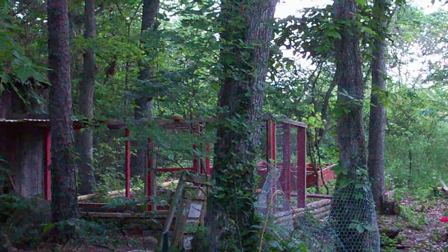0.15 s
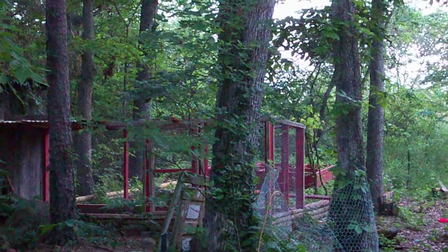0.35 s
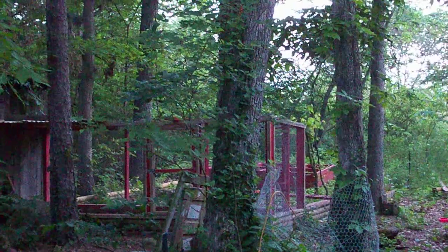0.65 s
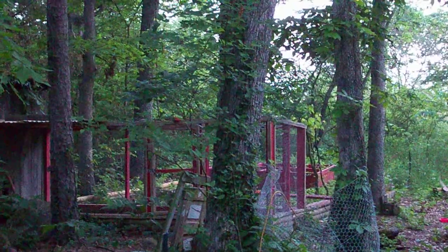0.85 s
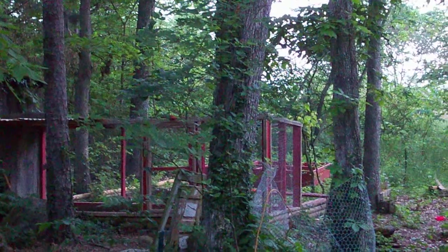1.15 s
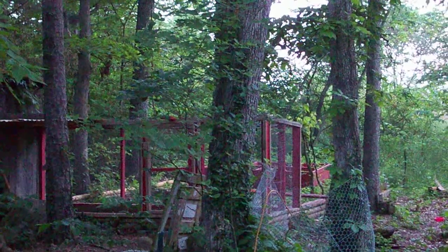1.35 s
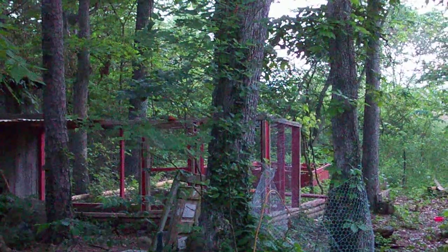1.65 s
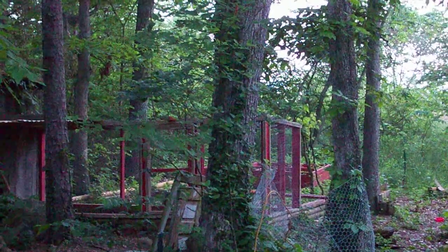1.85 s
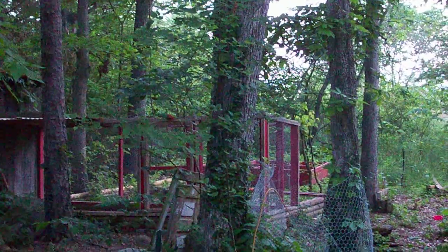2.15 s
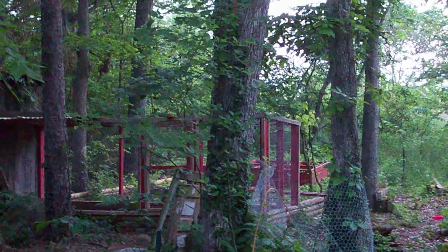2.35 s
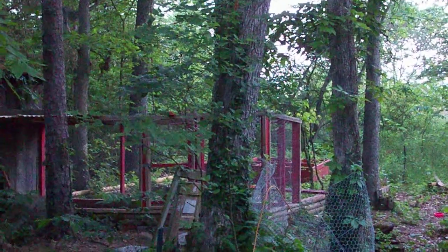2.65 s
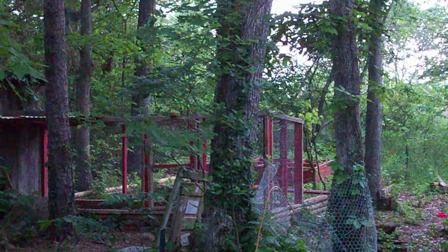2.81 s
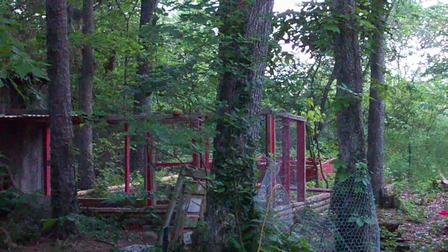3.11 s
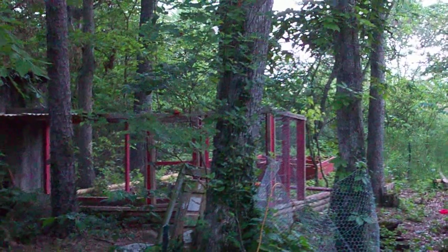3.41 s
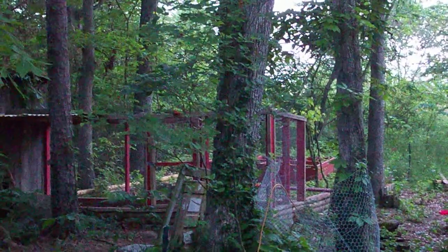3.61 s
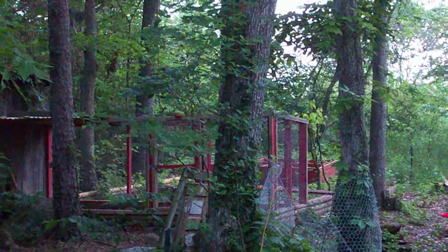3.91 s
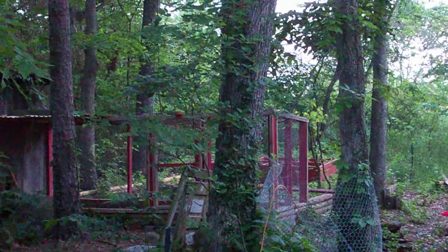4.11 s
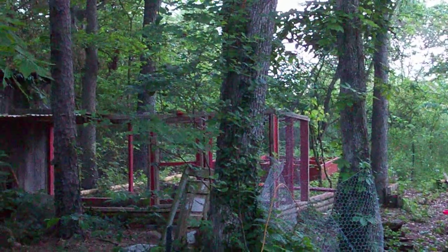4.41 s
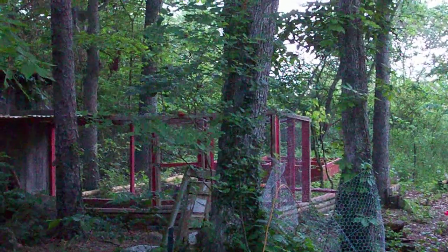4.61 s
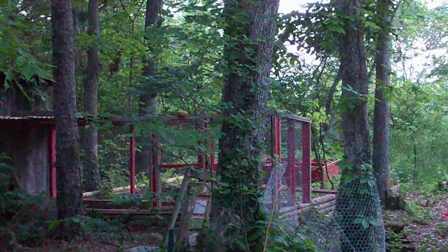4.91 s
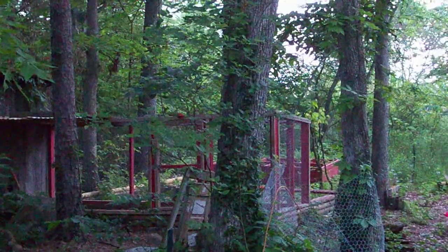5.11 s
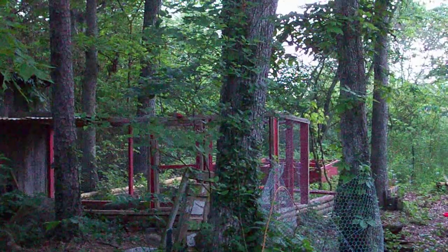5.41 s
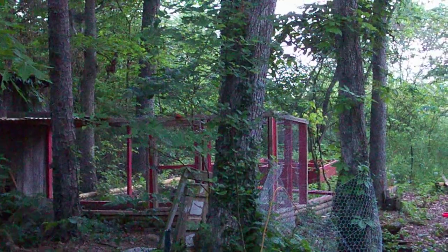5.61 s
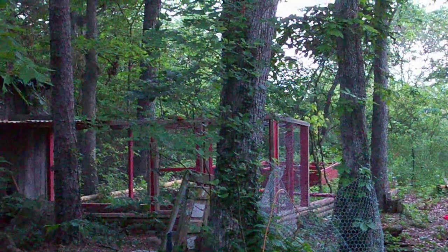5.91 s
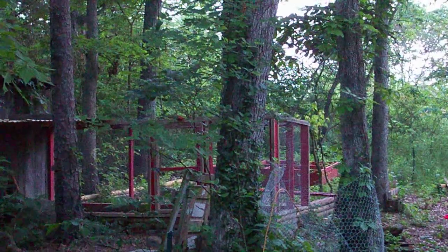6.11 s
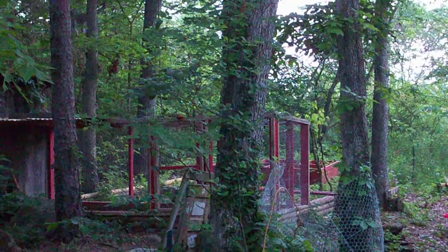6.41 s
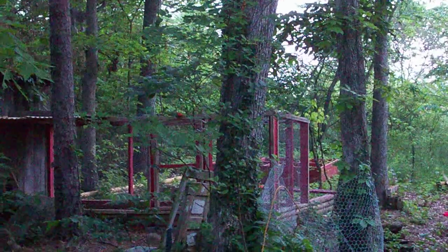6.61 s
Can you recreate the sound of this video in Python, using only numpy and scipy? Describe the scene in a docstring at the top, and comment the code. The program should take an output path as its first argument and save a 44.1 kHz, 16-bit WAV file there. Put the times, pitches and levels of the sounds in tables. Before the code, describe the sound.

A rooster crows hoarsely, then a peacock cries and honks, with chick peeps, songbirds and a distant rooster over faint insects in the woods.

```python
"""A rooster ends a hoarse crow in a wooded yard, the two sides of its syrinx beating against each other.
A peacock gives a two-part cry and a honk; a second rooster crows far off. All three are harmonic tones
shaped by a throat. A chick's peeps and the songbirds' whistles are gliding sines; pen boards knock.
Trunks and leaves scatter every call. Behind: moving air, insects, a distant engine hum that dies away."""
import sys
import numpy as np
from scipy import signal
from scipy.fft import rfft, irfft, next_fast_len
from scipy.io import wavfile
from scipy.ndimage import uniform_filter1d, map_coordinates

SR = 44100
rng = np.random.default_rng(int(sys.argv[2]) if len(sys.argv) > 2 else 0)


def wrap_up_sound(samples):
    """Save the sound to the file named by the first command line argument, as 16-bit audio."""
    columns = np.atleast_2d(samples).T
    # keep every value between -1 and 1, then stretch to whole-number steps
    tamed = np.clip(columns, -1, 1)
    steps = np.round(tamed * 32767).astype(np.int16)
    wavfile.write(sys.argv[1], SR, steps)


N = 297675

# steady whistle contour: (position [0-1], pitch [ratio], level [dB])
FLAT_CONTOUR = [(0, 1, -14), (.2, 1, -1), (.85, 1, 0), (1, 1, -10)]


def amp(db):
    """Decibels to gain."""
    return 10 ** (np.asarray(db) / 20)


def unit(x):
    """Scale to rms 1."""
    return x / np.sqrt(np.mean(x ** 2) + 1e-20)


def along(points, hz):
    """Interpolate (frequency [Hz], value) points on a log axis."""
    knots_hz, values = np.transpose(points)
    return np.interp(np.log(hz + 1), np.log(knots_hz + 1), values)


def wobble(rate_hz, size):
    """Smooth random curve with knots at rate_hz."""
    knots = rng.standard_normal(int(size * rate_hz / SR) + 4)
    return map_coordinates(knots, [np.arange(size) * rate_hz / SR])


def cycle(hz):
    """Running phase [rad]."""
    return 2 * np.pi * np.cumsum(hz) / SR


def add(track, start_s, x):
    """Mix x into the track."""
    span = track[max(round(start_s * SR), 0):][:len(x)]
    span += x[:len(span)]


def filtered(x, gain):
    """Zero-phase filter with response gain(hz)."""
    size = next_fast_len(N + SR // 2)
    return irfft(rfft(x, size) * gain(np.fft.rfftfreq(size, 1 / SR)), size)[:N]


def noise(spectrum):
    """Coloured noise, rms 1."""
    return unit(filtered(rng.standard_normal(N), lambda hz: amp(along(spectrum, hz))))


def near_rooster():
    """High crow, turning hoarse and breaking to a lower register; the two syrinx sides beat."""
    # syllables: (start [s], length [s], top [Hz], crest [0-1], scoop [0-1], sag [0-1],
    # opening [dB], closing [dB], overtones [dB], roughness [0-1])
    crow = [(0.0, 0.11, 1087, 0.48, .15, 0.36, -29.5, -35, -45, 0.01),
            (0.132, .135, 977.6, 0.32, .1, 0.04, -32, -36, -43, 0),
            (0.255, 0.22, 1008, .25, 0.06, 0.12, -31.5, -34.5, -43, 0.02),
            (0.439, 0.17, 893, 0.42, .01, 0.01, -42, -38, -48, .05),
            (0.593, 0.3586, 943.2, .65, 0, 0.08, -38.5, -43.5, -45, 0.01),
            (0.938, .52, 731, .1, .005, .135, -47, -53.5, -54, .021),
            (1.455, 0.038, 623, 0.12, 0, 0.33, -52.5, -53, -70, 0)]
    # throat in the high and low registers, rasp spectrum: (frequency [Hz], level [dB])
    high_throat = [(600, -9), (950, 21), (1400, -11.5), (1900, 5.5), (2200, -14), (2800, -37), (3800, -16),
                   (5000, -40), (8000, -57)]
    low_throat = [(500, -23.5), (760, 10.5), (950, 3.5), (1450, 4), (1750, -6.5), (2150, -8), (2450, -4.5),
                  (2900, -21.5), (5000, -43.5)]
    rasp = [(700, -8), (1000, -2), (1400, 3.5), (2000, 6.5), (2500, -1.5), (3200, -13.5), (5000, -44.5)]
    beat_hz = 44.86
    held, end = np.zeros(N), np.zeros(N)
    for row in crow[:-2]:
        t, hz, db, upper_db, rough = syllable(row, attack_s=0.0032, dull_db=-5.5, hoarse=0.28)
        strong = (t, hz, db, upper_db - 2.5, rough)
        weak = (t, hz - beat_hz, db - 4, upper_db - 7.5, rough)
        for side in (strong, weak):
            held += call(side, high_throat, split_hz=1500, rasp_db=-24, half_db=-53, uneven_db=0)
        add(held, t[0], amp(-24.5) * rough * noise(rasp)[:len(t)])
    for row in crow[-2:]:
        t, hz, db, upper_db, rough = syllable(row, attack_s=0.0052, dull_db=-1, hoarse=0.05)
        strong = (t, hz, db - 2.5, upper_db, rough)
        weak = (t, hz + beat_hz, db - 7, upper_db - 12.5, rough)
        for side in (strong, weak):
            end += call(side, low_throat, split_hz=1670, rasp_db=-5.5, half_db=-15.5, uneven_db=1)
    rattle = amp(3.5 * wobble(160, N))
    voice = ground(held + end * rattle, notch_hz=1093, width_hz=46, depth_db=-10)
    return woods(voice, trunks_db=-5.5, leaves_db=-3.5, tail_db=-11)


def syllable(row, attack_s, dull_db, hoarse):
    """Curves for one pitch arch; off the crest the slack voice roughens and overtones shift by dull_db."""
    start_s, length_s, top_hz, crest, scoop, sag, open_db, close_db, overtone_db, rough = row
    t = np.arange(int(length_s * SR)) / SR
    u, crest = t / length_s, np.clip(crest, 0.01, 0.99)
    slack = scoop * np.maximum(1 - u / crest, 0) ** 1.5
    slack += sag * np.maximum((u - crest) / (1 - crest), 0) ** 3
    onset_db = -20 * np.exp(-t / attack_s)
    db = open_db + (close_db - open_db) * u
    upper_db = overtone_db + dull_db * slack / max(scoop, sag)
    return start_s + t, top_hz * (1 - slack), db + onset_db, upper_db + onset_db, rough + hoarse * slack


def call(voice, throat, split_hz, rasp_db, half_db, uneven_db, beak=None):
    """Syrinx tone through a throat; effort sets the overtones above split_hz, hoarseness adds jitter."""
    t, pitch_hz, db, upper_db, rough = voice
    phase = cycle(pitch_hz * (1 + rough * wobble(320, len(t))))
    order = np.arange(1, 37)[:, None] / 2  # half orders: alternating strong and weak cycles
    hz = order * pitch_hz
    partial_db = along(throat, hz) + half_db * (order != np.round(order))
    partial_db += uneven_db * wobble(35, hz.size).reshape(hz.shape)
    if beak:
        time_s, centre_hz, boost_db = np.transpose(beak)
        detune = np.log(hz / np.interp(t, time_s, centre_hz)) / 0.065
        partial_db += np.interp(t, time_s, boost_db) / (1 + detune ** 2)
    gain = amp(partial_db) * (hz < SR / 4)
    upper = 1 / (1 + (split_hz / hz) ** 16)
    low, high = (band / np.linalg.norm(band, axis=0) for band in (gain * (1 - upper), gain * upper))
    partials = (amp(db) * low + amp(upper_db) * high) * np.sin(order * phase + order ** 2)
    tone = np.sqrt(2) * partials.sum(axis=0)
    rasp = amp(db + rasp_db) * noise(throat)[:len(t)] * (1 + np.cos(phase))
    out = np.zeros(N)
    add(out, t[0], (tone + rasp) * signal.windows.tukey(len(t), min(1, 0.026 * SR / len(t))))
    return out


def peacock():
    """Brassy rising cry, then a soft syllable that cracks at both ends; later one honk."""
    # syllables: (start [s], length [s], top [Hz], crest [0-1], scoop [0-1], sag [0-1],
    # opening [dB], closing [dB], overtones [dB], roughness [0-1])
    rows = [(3.04, 0.25, 615.4, 0.65, .21, 0.22, -44, -32, -29, 0.0036),
            (3.28, 0.057, 470, 0.12, 0.013, .03, -42, -46, -50.5, .008),
            (3.335, .23, 498.5, .38, 0.059, .06, -41.5, -49, -47, 0.0042),
            (3.553, .125, 460.6, 0.073, .01, 0.046, -41.5, -47, -61.5, 0.0054),
            (5.452, 0.16, 666.8, 0.71, 0.11, 0.018, -33, -38.5, -31.5, 0.0044)]
    # throat responses: (frequency [Hz], level [dB])
    cry_throat = [(300, -20), (600, -7.5), (1200, -3.5), (1800, -3.5), (2450, 0), (3050, 1.5), (3650, -3),
                  (4300, -7), (4900, -2.5), (5500, -8), (6150, -8), (6750, -7), (7500, -14.5),
                  (8700, -32.5)]
    soft_throat = [(230, -14.5), (480, -20), (980, -4), (1480, -5.5), (2000, -30), (2500, -9.5),
                   (3000, -6.5), (3600, -16.5), (4500, -8), (5300, -10), (7000, -20.5), (8500, -32)]
    honk_throat = [(330, -19), (570, -10.5), (660, -8), (1330, -1.5), (2000, -3), (2680, -2), (3330, -8.5),
                   (4000, -4.5), (4650, -12.5), (5330, -4), (6000, -8.5), (6700, -7.5), (7400, -10.5),
                   (8700, -34)]
    # mouth resonance, falling as the beak closes: (time [s], centre [Hz], boost [dB])
    beak = [(3.03, 2100, 8), (3.09, 2300, 7), (3.135, 3500, 7), (3.18, 3100, 5), (3.21, 3100, 1),
            (3.232, 3000, 7), (3.245, 2400, 10), (3.27, 1620, 12), (3.3, 1400, 4)]
    cry, honk = (syllable(row, attack_s=0.012, dull_db=-25, hoarse=0.12) for row in (rows[0], rows[-1]))
    catch, soft, crack = (syllable(row, attack_s=0.0067, dull_db=-4, hoarse=0.052) for row in rows[1:-1])
    voice = call(cry, cry_throat, split_hz=1900, rasp_db=-16.5, half_db=-37.5, uneven_db=5.5, beak=beak)
    voice += call(soft, soft_throat, split_hz=1000, rasp_db=-30, half_db=-39, uneven_db=5.5)
    for cracked in (catch, crack):
        voice += call(cracked, soft_throat, split_hz=1200, rasp_db=-28.5, half_db=-5.5, uneven_db=3)
    voice += call(honk, honk_throat, split_hz=2260, rasp_db=-18.5, half_db=-43, uneven_db=7.5)
    yard_edge_echo = amp(-20.5) * filtered(voice, lambda hz: 1 / (1 + (hz / 1900) ** 2))
    add(voice, 0.185, yard_edge_echo)
    return woods(voice, trunks_db=-8, leaves_db=-9.5, tail_db=-15)


def far_rooster():
    """Distant crow: a short muffled note, a hoarse second one and a long, clear ending."""
    # syllables: (start [s], length [s], top [Hz], crest [0-1], scoop [0-1], sag [0-1],
    # opening [dB], closing [dB], overtones [dB], roughness [0-1])
    rows = [(4.575, .13, 803, .7, .22, .03, -68, -63, -56, .025),
            (4.9, .52, 878, .7, .012, .025, -55, -55.5, -60, .035),
            (5.4, .32, 856, .4, .006, .018, -56, -57, -61, .007),
            (5.7, 1.06, 885, .33, .05, .12, -59, -53, -61.5, .004)]
    # throat response: (frequency [Hz], level [dB])
    throat = [(600, -18.5), (870, -2.5), (1250, 11), (1700, -5.5), (2600, -5), (3500, -42), (4400, -10.5),
              (6000, -41)]
    first, *rest = (syllable(row, attack_s=0.004, dull_db=3, hoarse=0.06) for row in rows)
    opening = call(first, throat, split_hz=2800, rasp_db=-8, half_db=-34, uneven_db=4.5)
    opening = filtered(opening, lambda hz: 1 / (1 + (hz / 1750) ** 10))
    crow = sum(call(part, throat, split_hz=1300, rasp_db=-23, half_db=-45, uneven_db=2.2) for part in rest)
    voice = ground(amp(7) * opening + amp(2.5) * crow, notch_hz=891, width_hz=9.8, depth_db=-7)
    return woods(voice, trunks_db=-9, leaves_db=-12, tail_db=-13)


def chick():
    """Arched peeps; the later ones dip in level just before their final flick."""
    # peeps: (start [s], length [s], pitch [Hz], level [dB], dip [dB])
    peeps = [(1.517, 0.11, 2668, -39, 1.5), (1.769, 0.091, 2669, -39.5, 1.5), (3.905, .11, 2690, -35.5, -9),
             (4.147, .11, 2716, -33, -11.5), (4.389, .112, 2710, -32.5, -15.5),
             (4.637, 0.093, 2669, -36.5, -5.5)]
    # peep contour: (position [0-1], pitch [ratio], level [dB], dip weight [0-1])
    arch = [(0, .9, -29, 0.16), (.14, .935, -6.5, 0), (.38, 0.97, 5, 0.78), (.58, 0.99, 5, 1),
            (.75, 0.94, -2.5, 0.33), (.82, .97, 3.5, 0), (0.891, 0.83, -14, 0), (1, .78, -18.5, 0.15)]
    out = np.zeros(N)
    for *note, dip_db in peeps:
        contour = [(u, ratio, db + dip_weight * dip_db) for u, ratio, db, dip_weight in arch]
        out += notes([note], contour, waver=0.0013)
    return woods(out, trunks_db=2.5, leaves_db=-10, tail_db=-9.5)


def notes(rows, contour, waver):
    """Sine whistles sharing one contour, with random pitch waver."""
    out = np.zeros(N)
    position, ratio, contour_db = np.transpose(contour)
    for start_s, length_s, hz, db in rows:
        u = np.linspace(0, 1, int(length_s * SR))
        pitch_hz = uniform_filter1d(hz * np.interp(u, position, ratio), size=300)
        pitch_hz *= 1 + waver * wobble(250, len(u))
        envelope = amp(db + np.interp(u, position, contour_db)) * signal.windows.tukey(len(u), 0.1)
        add(out, start_s, np.sqrt(2) * envelope * np.sin(cycle(pitch_hz)))
    return out


def songbirds():
    """Warbles, chips and pings fairly near; slurs and rises from deep in the canopy, mostly scatter."""
    # notes: (start [s], length [s], pitch [Hz], level [dB])
    warbles = [(1.255, 0.19, 3750, -55.5), (2.57, 0.33, 2795, -66.5), (3.32, .22, 3872, -51.5),
               (6.075, 0.25, 3800, -51)]
    slurs = [(4.475, 0.14, 5780, -52), (4.76, 0.13, 5740, -48), (5.045, 0.13, 5680, -47.5),
             (5.33, 0.12, 5510, -47), (5.6, .135, 5380, -48.5), (5.86, 0.14, 5060, -48)]
    rises = [(2.51, 0.16, 5540, -63.5), (2.84, .15, 5530, -59), (6.335, 0.06, 5353, -54)]
    chips = [(.29, .012, 7800, -58.5), (.68, 0.073, 6880, -67), (1.2, 0.043, 4100, -58.5),
             (2.005, 0.032, 7860, -49), (2.195, 0.024, 5230, -60), (2.215, 0.031, 4300, -61),
             (4.098, 0.03, 7135, -59), (4.25, 0.059, 5293, -59.5), (5.215, 0.039, 8100, -49.5),
             (6.11, 0.057, 5660, -55)]
    pings = [(.292, 0.028, 7210, -52), (.53, 0.18, 6730, -65), (.95, 0.44, 6440, -73.5),
             (2.47, 0.21, 2450, -61.5), (3.99, 0.25, 4707, -64), (4.46, 0.34, 4615, -59)]
    # contours: (position [0-1], pitch [ratio], level [dB])
    warble_contour = [(0, .66, -5.5), (0.156, .76, 3.5), (.32, .74, -7.5), (0.482, .86, 8),
                      (0.628, 1.02, -1), (.76, .99, -2), (0.901, .9, -2), (1, 0.14, -22.5)]
    slur_contour = [(0, 1.01, -2), (0.119, 1, 0.5), (0.482, .98, -6.5), (0.652, .88, 1.5), (.85, .76, 1),
                    (1, 0.62, -4.5)]
    rise_contour = [(0, 0.61, -8), (0.219, 0.97, 15), (.35, 1, 2), (.75, 1, 4), (1, 0.94, -10.5)]
    chip_contour = [(0, 1, -9), (0.149, 1, 7.5), (.5, .86, 6.5), (1.001, 0.62, -15.5)]
    warbler = amp(1.5) * notes(warbles, warble_contour, waver=0.011)
    song = notes(slurs, slur_contour, waver=0.01) + notes(rises, rise_contour, waver=0.014)
    chatter = notes(chips, chip_contour, waver=0.022) + notes(pings, FLAT_CONTOUR, waver=0.0026)
    far = woods(amp(-2) * song, trunks_db=-3, leaves_db=1, tail_db=0)
    return far + woods(warbler + chatter, trunks_db=-3, leaves_db=0, tail_db=-2)


def thin_whistles():
    """Two sides of a syrinx start on one very high pitch and drift apart."""
    # whistles: (start [s], length [s], pitch [Hz], level [dB], spread [ratio])
    whistles = [(1.487, .23, 8036, -58, 0.056), (1.741, 0.18, 8050, -55.5, 0.063),
                (1.943, 0.079, 8130, -57, 0.022), (4.727, 0.2, 8050, -63, 0.021),
                (4.864, 0.27, 8020, -63, 0.035), (5.045, 0.25, 8080, -60.5, 0.035)]
    out = np.zeros(N)
    for *note, spread in whistles:
        for drift, side_db in ((-1.3, 6.5), (0.76, 0)):
            contour = [(u, ratio + drift * spread * u, db + side_db) for u, ratio, db in FLAT_CONTOUR]
            out += notes([note], contour, waver=0.0055)
    return woods(out, trunks_db=-5, leaves_db=-7, tail_db=-5)


def knocks():
    """Dull taps on the pen boards: decaying noise bursts."""
    # taps: (time [s], level [dB])
    taps = [(1.214, -54.5), (2.041, -55), (2.297, -50), (2.33, -71), (6.458, -48), (6.485, -61)]
    # board spectrum: (frequency [Hz], level [dB])
    board = [(150, -9), (500, -1.5), (1000, -3.5), (1600, -10), (3000, -23), (8000, -49.5)]
    t60_s = 0.14
    envelope, t = np.zeros(N), np.arange(SR // 4) / SR
    for start_s, db in taps:
        add(envelope, start_s, amp(db - 60 * t / t60_s))
    return woods(envelope * noise(board), trunks_db=-21, leaves_db=-4, tail_db=-9.5)


def ground(x, notch_hz, width_hz, depth_db):
    """Ground reflection cancels a narrow band."""
    return filtered(x, lambda hz: amp(depth_db / (1 + ((hz - notch_hz) / width_hz) ** 2)))


def woods(x, trunks_db, leaves_db, tail_db):
    """Direct sound, trunk echoes, quick foliage scatter and a long tail."""
    # tail decay: (frequency [Hz], t60 [s])
    decay = [(100, 0.28), (600, 1.48), (2500, 0.79), (5000, 1.34), (9000, 0.58)]
    # trunk echoes: (delay [s], level [dB])
    echoes = [(0.01, -11.5), (.024, -14), (.046, -9), (0.063, -16), (0.105, -18.5)]
    hz, frame_s, spectra = signal.stft(rng.standard_normal(SR), SR, nperseg=256)
    spectra *= amp(-60 * frame_s / along(decay, hz)[:, None])
    t = np.arange(SR) / SR
    tail = signal.istft(spectra, SR, nperseg=256)[1][:SR] * (1 - np.exp(-t / 0.011))
    leaves = rng.standard_normal(SR) * amp(-60 * t / 0.26) * (1 - np.exp(-t / 0.0048))
    response = (amp(tail_db) * unit(tail) + amp(leaves_db) * unit(leaves)) / np.sqrt(SR)
    response[0] += 1
    for delay_s, db in echoes:
        add(response, delay_s, amp([db + trunks_db]))
    return signal.fftconvolve(x, response / np.linalg.norm(response))[:N]


def insects():
    """Two steady noise drones and a high buzz that swells in bouts."""
    # spectra: (frequency [Hz], level [dB])
    drone_band = [(2800, -35), (3500, -15.5), (3950, -9), (4300, -0.5), (4480, -11.5), (4700, -36.5),
                  (5500, -52)]
    shrill_band = [(6800, -30), (7600, 4), (8050, -2.5), (8500, -14.5), (8900, -24.5)]
    buzz_band = [(5200, -23), (6200, -6.5), (6650, -6.5), (7300, -9.5), (8200, -35)]
    # buzz bouts: (start [s], length [s], level [dB])
    bouts = [(0.422, .45, -73), (2.182, 0.4, -60), (2.607, 0.31, -58), (3.17, 0.71, -54),
             (6.074, 0.38, -61.5)]
    floor_db, fade_s = -67.5, 0.13
    t = np.arange(N) / SR
    drone = amp(-59.5 + 1.1 * wobble(3, N) + 0.59 * wobble(90, N)) * noise(drone_band)
    shrill = amp(-75.5) * noise(shrill_band)
    swell = sum(amp(db) * np.clip(np.minimum(t - start_s, start_s + length_s - t) / fade_s, 0, 1)
                for start_s, length_s, db in bouts)
    buzz = np.hypot(amp(floor_db), swell) * amp(1.6 * wobble(60, N)) * noise(buzz_band)
    return drone + shrill + buzz


def engine():
    """Distant hum: declines slowly, then dies away."""
    hum_hz, stop_s = 71.5, 1.7
    decline_db_per_s, stop_db_per_s = 2.5, 25.5
    t = np.arange(N) / SR
    db = -48 - decline_db_per_s * t - stop_db_per_s * np.maximum(t - stop_s, 0)
    return np.sqrt(2) * amp(db) * np.sin(cycle(hum_hz + 0.46 * wobble(4.5, N)))


def air():
    """Moving air: broad noise, slowly wavering in level."""
    # air spectrum: (frequency [Hz], level [dB])
    spectrum = [(15, -6.5), (25, 1.5), (50, -0.5), (100, -7.5), (160, -13.5), (250, -16), (400, -18.5),
                (800, -22), (1250, -22.5), (2000, -28), (2500, -21), (3200, -24), (5000, -24.5),
                (8000, -43.5)]
    return amp(-55 + 1.1 * wobble(2.825, N)) * noise(spectrum)


def scene():
    """Mono mix of birds, knocks and background."""
    birds = near_rooster() + far_rooster() + peacock() + chick() + songbirds() + thin_whistles()
    return (birds + knocks() + air() + insects() + engine())[None]


def record(dry):
    """Steep low-pass plus a DC offset."""
    cutoff_hz, offset = 8700, -0.0245
    return filtered(dry[0], lambda hz: 1 / np.sqrt(1 + (hz / cutoff_hz) ** 120))[None] + offset


dry = scene()
out = record(dry)
wrap_up_sound(out)
```